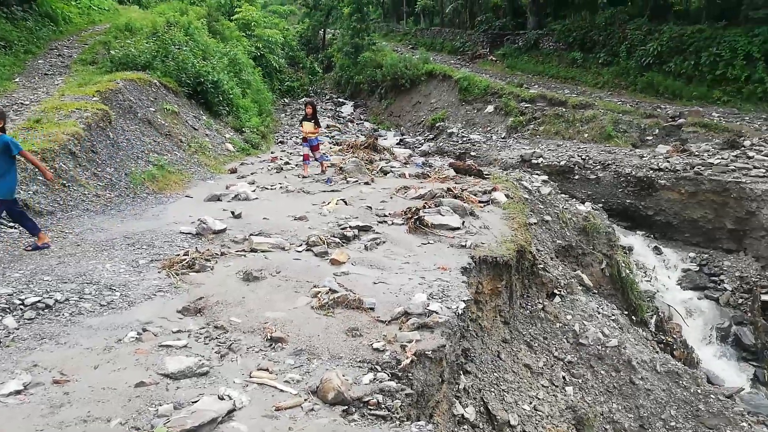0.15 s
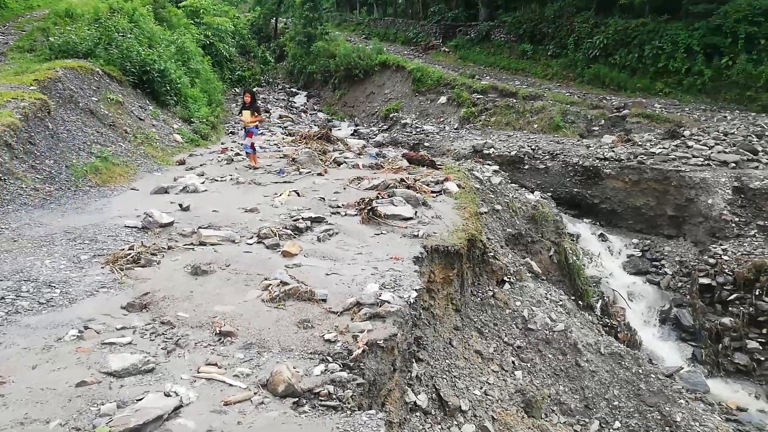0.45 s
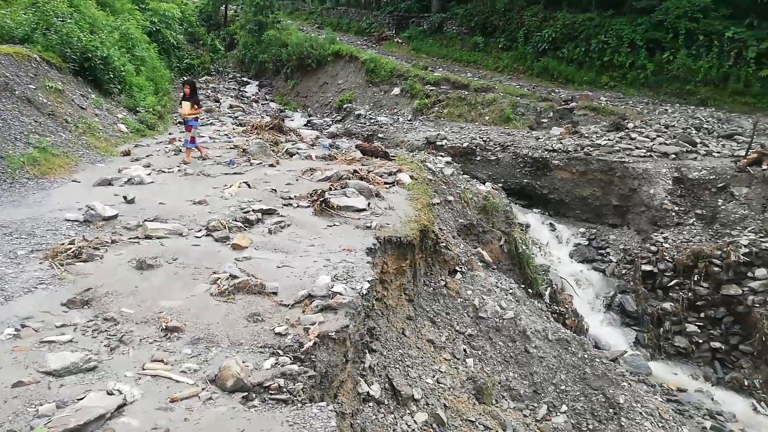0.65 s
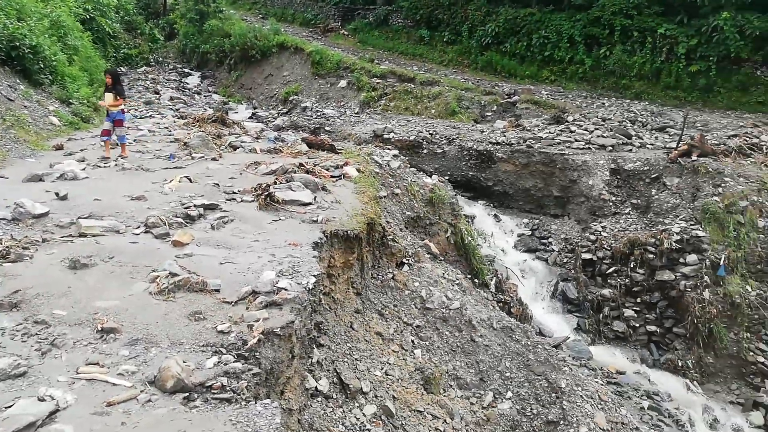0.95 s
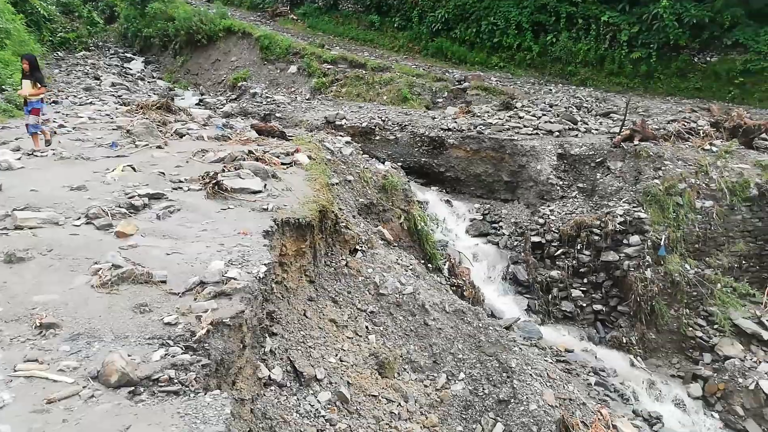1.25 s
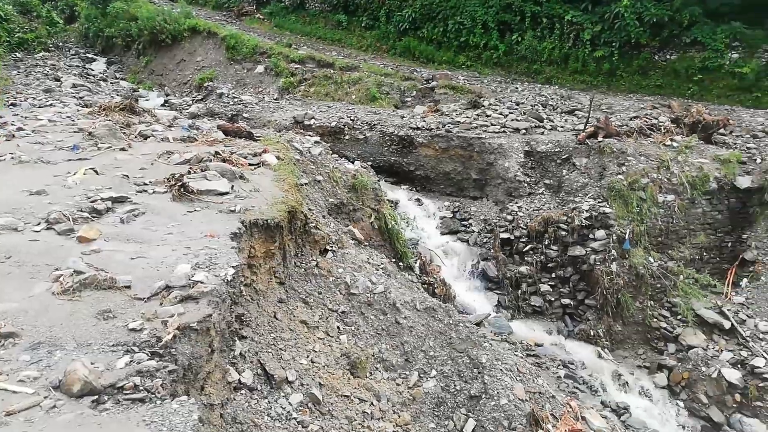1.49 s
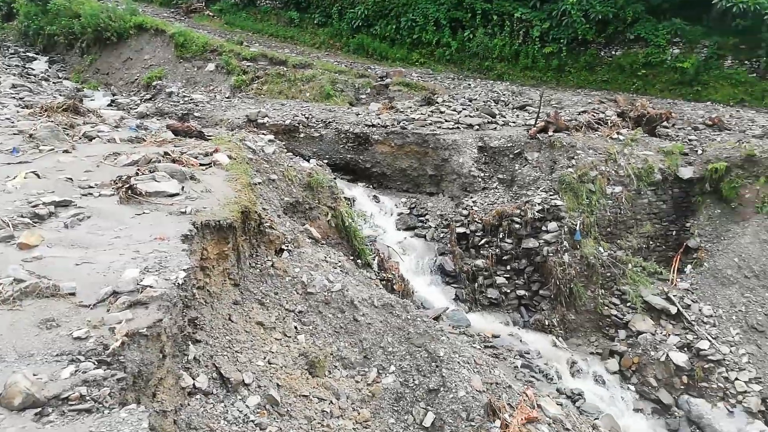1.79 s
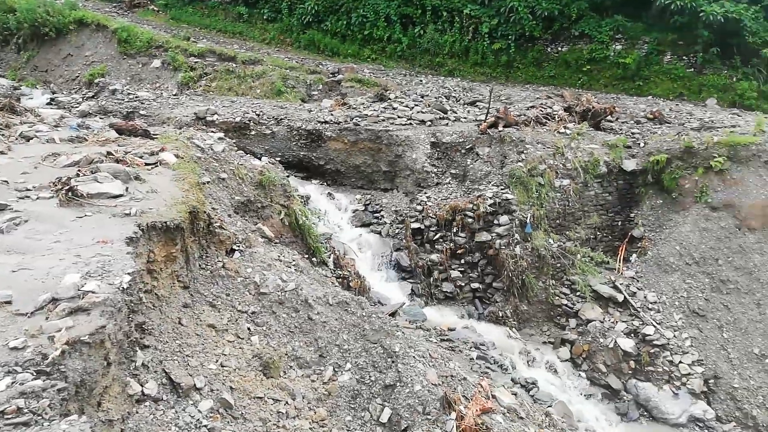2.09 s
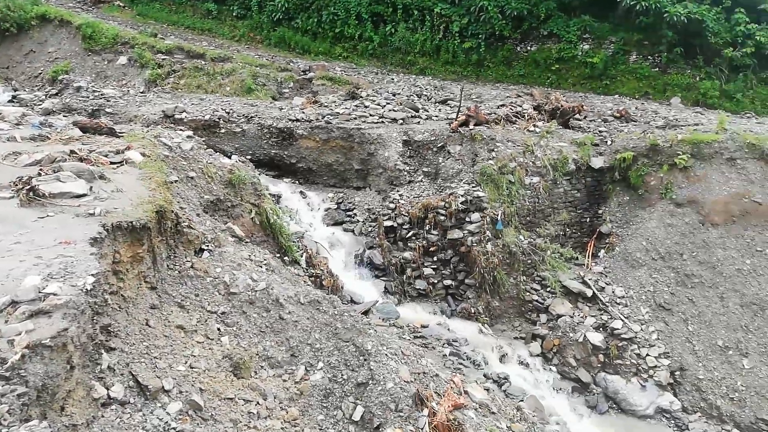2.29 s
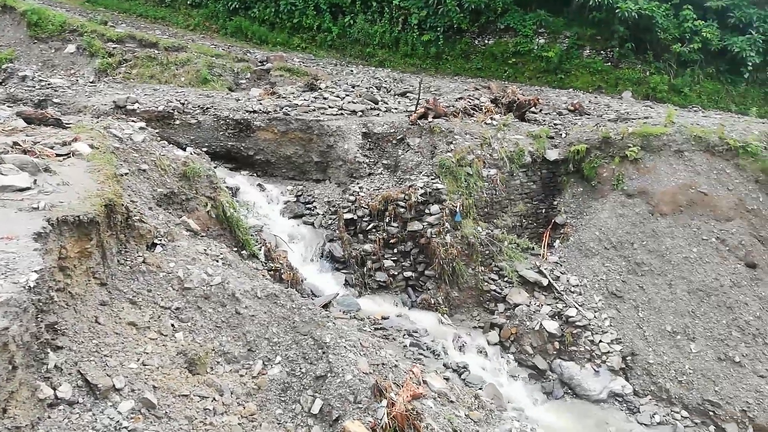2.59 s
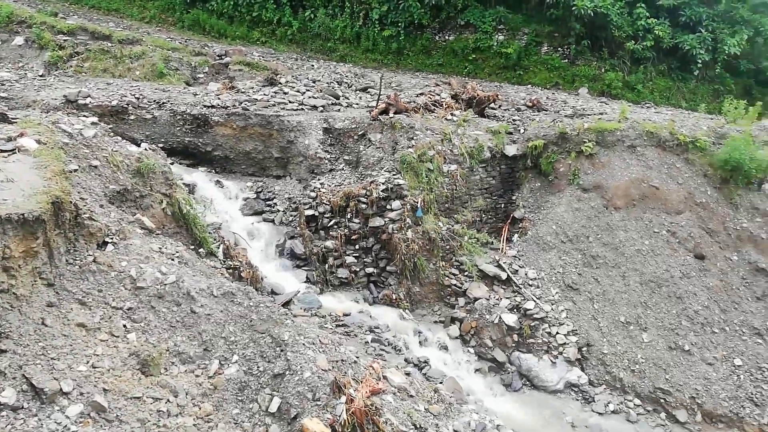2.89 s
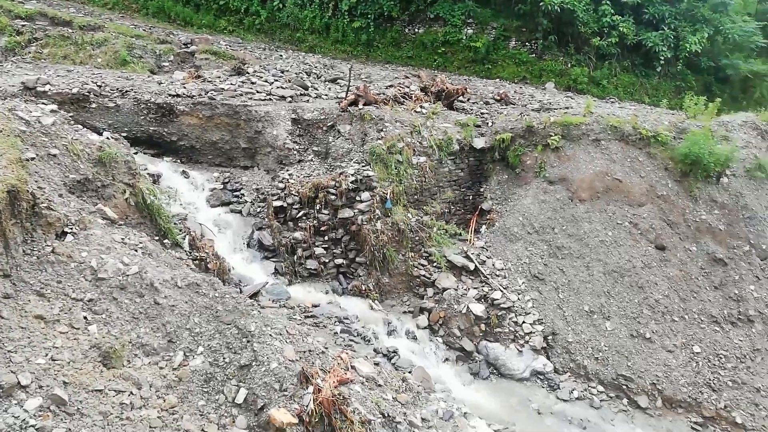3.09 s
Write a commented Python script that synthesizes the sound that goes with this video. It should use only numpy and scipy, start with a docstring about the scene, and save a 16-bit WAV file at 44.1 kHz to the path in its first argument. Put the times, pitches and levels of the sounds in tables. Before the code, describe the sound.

Floodwater rushes steadily over rocks with a low roar and a hiss of spray.

```python
"""Floodwater tumbling down a rocky gully, heard from some way off on a handheld camera's stereo pair.
From the start the water gives a smooth roar, dense spray hiss and faint pings of trapped air.
The right microphone is open to it; the left, shadowed by the body, hears it dull and late.
From about 0.8 s the camera pans across the water and the colour shifts, while single bands briefly
swell and sink. In the last half second the spray eases and the low roar comes up."""
import sys
import numpy as np
from scipy import signal
from scipy.io import wavfile
from scipy.ndimage import uniform_filter1d

SR = 44100
rng = np.random.default_rng(int(sys.argv[2]) if len(sys.argv) > 2 else 0)


def dump_mix(stems):
    """Bounce the given channels to the path in sys.argv[1] as a 16-bit WAV at rate SR."""
    frames = np.atleast_2d(stems).T  # one column per channel
    limited = np.clip(frames, -1, 1)  # hard clip at full scale
    pcm = np.round(limited * 32767).astype(np.int16)
    wavfile.write(sys.argv[1], SR, pcm)


N = 143325
FRAME, HOP = 1024, 256

# Colour of the water at the open microphone: frequency_hz, relative_level_db
WATER_COLOUR = [(20, -40), (60, -27), (115, -5), (200, -6), (330, -5), (390, -7.5), (455, -14.5), (600, -5),
                (760, -1), (1000, -6), (1200, -7.5), (1500, -5.5), (1750, -8), (2100, -7), (2400, -8.5),
                (2800, -7.5), (3150, -9), (3500, -6.5), (3900, -6), (4300, -4), (4700, -4), (5600, -9),
                (6900, -10), (8000, -7.5), (9200, -1.5), (10100, 1), (11200, -4.5), (13000, -13),
                (15000, -19)]
# Rise and fall of the low roar: time_s, gain_db
ROAR_LEVEL = [(0, 2), (.3, -2), (.55, -1.5), (.85, -0.5), (1.1, -3.5), (1.5, 0.5), (1.75, -1.3),
              (1.95, -0.2), (2.15, -2), (2.35, -1), (2.7, -1.7), (3.25, 0.3)]
# Rise and fall of the spray hiss: time_s, gain_db
SPRAY_LEVEL = [(0, -0.1), (.5, 1), (1.1, 1.5), (1.7, 1), (2.3, -0.1), (2.8, -0.3), (3.25, -3)]
# Moments when one band swells or sinks: centre_s, length_s, centre_hz, width_hz, right_db, left_db
BAND_SWELLS = [(.15, 0.35, 4500, 1200, 0, -1.5), (.9, 0.43, 2300, 700, 1.8, 4), (1.447, .5, 600, 250, 2, 2),
               (1.5, .5, 1500, 500, -1.5, 1), (1.5, .7, 4200, 600, 1.5, 2), (2.0, .6, 1410, 500, -1, 0),
               (2.0, .3, 5360, 500, 3, -1), (2.25, 0.23, 3740, 500, 2, 3),
               (2.948, 0.21, 610, 350, -3.5, -3), (2.97, .2, 1530, 200, 3, -1),
               (3.1, .4, 4000, 1500, 0, -2)]
# Shadow of the body over the left microphone: frequency_hz, left_minus_right_db
BODY_SHADOW = [(30, .1), (100, -.4), (215, -.8), (300, -1.8), (390, -2.9), (470, -4.1), (600, -8.5),
               (780, -12.9), (1000, -13.4), (1350, -10.8), (1800, -13.6), (2370, -12.5), (3000, -12.5),
               (3900, -17.7), (4700, -19.4), (6000, -22.1), (7300, -22.8), (8600, -28), (10000, -29.4),
               (11500, -30), (14600, -30.4)]
# How alike the two microphones hear the water: frequency_hz, coherence (0-1)
MIC_COHERENCE = [(30, .88), (80, .985), (350, .98), (470, .95), (620, .965), (780, .91), (1000, .67),
                 (1500, .67), (1850, .33), (2200, .55), (2600, .28), (4700, .52), (5500, .36), (7500, .34),
                 (10000, .57), (14600, .1)]
# How far the camera has turned: time_s, share_of_pan (0-1)
PAN_PATH = [(0, 0.3), (.8, 0.32), (1.6, 0.49), (2.4, 0.63), (3.25, 0.77)]
# Colour change over a full pan from 0 to 1: frequency_hz, right_db, left_db
PAN_COLOUR = [(90, 7, 7), (200, 0, -1), (380, 2.5, -1), (650, -2.5, -10), (1010, 5, 7), (1520, 4, 18),
              (2590, -1.5, 3), (3840, 3.7, 8), (4800, 4.5, 5), (5800, 6, .3), (7400, -4.5, -.3),
              (10000, 3.5, 2), (13500, 4, 7)]


def gain_of(db):
    """Decibels to gain."""
    return 10 ** (np.asarray(db) / 20)


def unit_rms(x):
    """Scales to rms 1."""
    return x / np.sqrt(np.mean(abs(x) ** 2) + 1e-20)


def over_hz(table, hz):
    """Columns of a table, joined on a log-frequency axis."""
    table_hz, *columns = np.transpose(table)
    return [np.interp(np.log(hz + 1), np.log(table_hz + 1), column)[:, None] for column in columns]


def over_time(table, t):
    """A table's value at times t, joined by straight lines."""
    return np.interp(t, *np.transpose(table))


def warble_and_flicker(t, hz, warble_db=1.02, flicker_db=.5):
    warble, flicker = rng.standard_normal((len(t), len(hz), 2)).T
    warble = uniform_filter1d(uniform_filter1d(warble, size=3, axis=0), size=9, axis=1)
    flicker = uniform_filter1d(uniform_filter1d(flicker, size=120, axis=0), size=3, axis=1)
    return warble_db * unit_rms(warble) + flicker_db * unit_rms(flicker)


def bubbles(pitches=40, per_s=1500, cycles=23.3, rise=0.0848, size_db=3):
    """Trapped air of many sizes rings in short rising pings, equally strong at every pitch."""
    out = np.zeros(N)
    for pitch_hz in np.linspace(503.4, 10960, pitches):
        born = rng.random(N) < per_s / pitches / SR
        strength = gain_of(size_db * np.minimum(rng.exponential(1, N), 3))
        age = np.arange(4000) / SR * pitch_hz / cycles  # small, high bubbles die sooner
        ping = np.sin(2 * np.pi * cycles * age * (1 + rise * age)) * age * np.exp(-3 * age)
        out += signal.oaconvolve(born * strength, ping / np.linalg.norm(ping))[:N]
    return out


def swells(t, hz):
    """Soft-edged rises and dips of single bands, in dB at the left and right microphones."""
    out = np.zeros((2, len(hz), len(t)))
    for centre_s, length_s, centre_hz, width_hz, right_db, left_db in BAND_SWELLS:
        band = np.exp(-(2 * (hz - centre_hz) / width_hz) ** 2)
        moment = np.exp(-(2 * (t - centre_s) / length_s) ** 2)
        out += np.multiply.outer([left_db, right_db], np.outer(band, moment))
    return out


def spray(t, hz, above_hz=7500):
    """Slow rise and fall of the spray's hiss, in dB."""
    return np.outer(1 / (1 + (above_hz / (hz + 1)) ** 8), over_time(SPRAY_LEVEL, t))


def roar(t, hz, below_hz=360):
    """Slow rise and fall of the water's low roar, in dB."""
    return np.outer(1 / (1 + (hz / below_hz) ** 8), over_time(ROAR_LEVEL, t))


def rush(t, hz):
    """The even noise of tumbling water, as random short-time spectra."""
    real, imaginary = rng.standard_normal((2, len(hz), len(t)))
    return unit_rms(real + 1j * imaginary)


def microphones(water, t, hz, around_body_s=.00052, port_hz=620):
    """The panning pair: sound reaches the left one around the body and through a muffled, lagging port."""
    lag = 2 * np.pi * hz * around_body_s + np.arctan(hz / port_hz)
    late = water * np.exp(-1j * lag)[:, None]
    coherence = over_hz(MIC_COHERENCE, hz)[0]
    left = coherence * late + np.sqrt(1 - coherence ** 2) * rush(t, hz)
    shadow_db = over_hz(BODY_SHADOW, hz)[0]
    pan = over_time(PAN_PATH, t) - .5
    right_db, left_db = over_hz(PAN_COLOUR, hz)
    return np.array([left * gain_of(shadow_db + left_db * pan), water * gain_of(right_db * pan)])


def torrent(bubble_db=-19):
    """Floodwater over rocks: rush and faint bubbles under one shifting colour, at both microphones."""
    pings = signal.stft(bubbles(), nperseg=FRAME, noverlap=FRAME - HOP)[2]
    hz = np.fft.rfftfreq(FRAME, 1 / SR)
    t = np.arange(pings.shape[1]) * HOP / SR
    water = rush(t, hz) + gain_of(bubble_db) * unit_rms(pings)
    pair = microphones(water, t, hz)
    colour_db = over_hz(WATER_COLOUR, hz)[0] + roar(t, hz) + spray(t, hz) + swells(t, hz)
    colour_db += warble_and_flicker(t, hz)
    return signal.istft(pair * gain_of(colour_db), nperseg=FRAME, noverlap=FRAME - HOP)[1][:, :N]


def scene(level_db=-28):
    """The torrent alone, its rms level set at the open right microphone."""
    pair = torrent()
    return gain_of(level_db) * pair / np.sqrt(np.mean(pair[1] ** 2))


def record(dry):
    """The camera cuts the treble steeply above 15330 Hz."""
    lowpass = signal.firwin(511, 15330, window=("kaiser", 9), fs=SR)
    return signal.oaconvolve(dry, lowpass[None], "same")


dry = scene()
out = record(dry)
dump_mix(out)
```